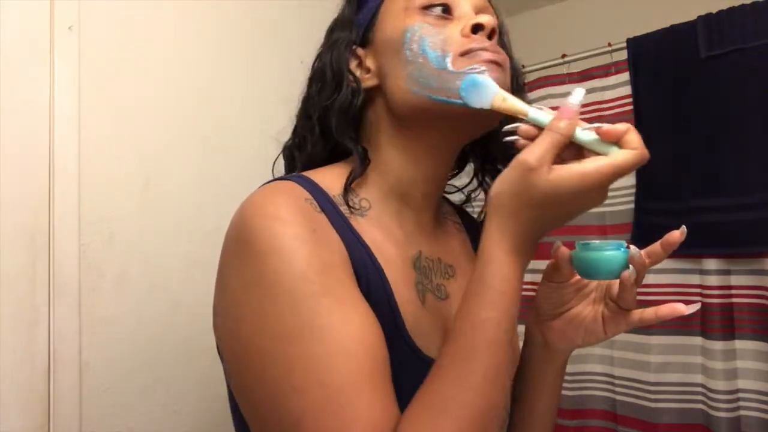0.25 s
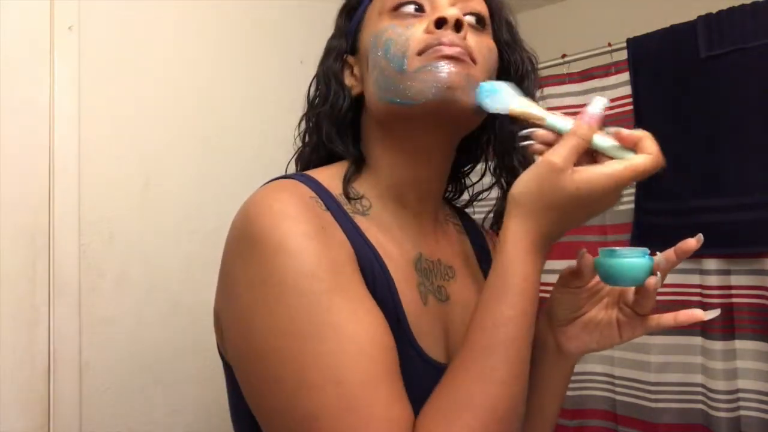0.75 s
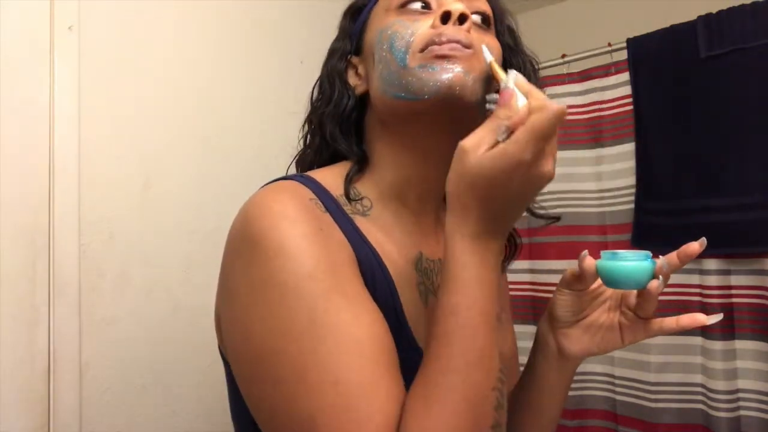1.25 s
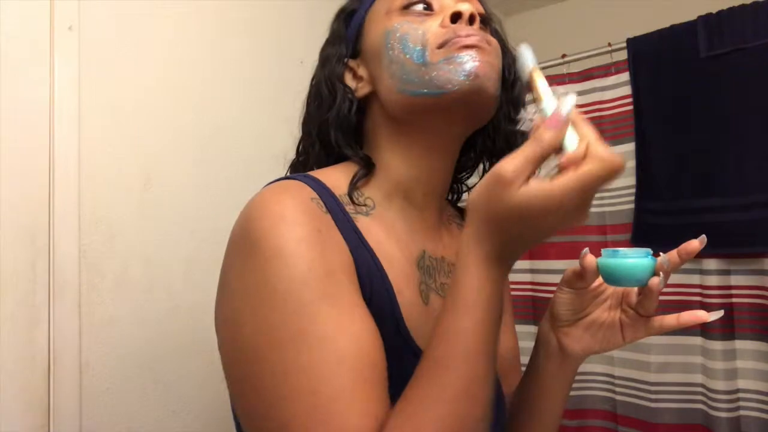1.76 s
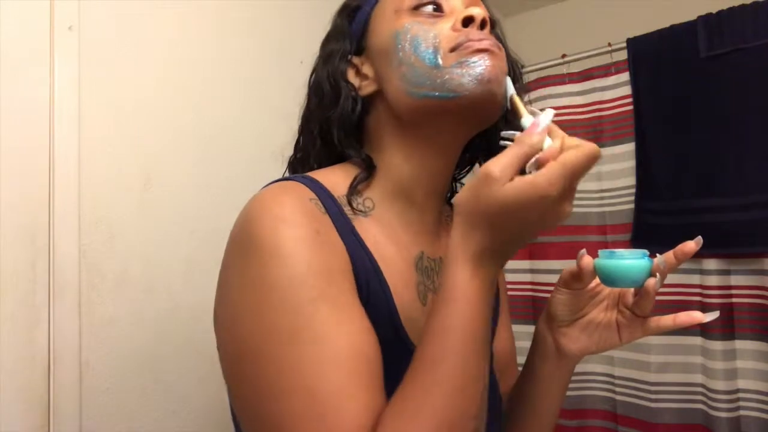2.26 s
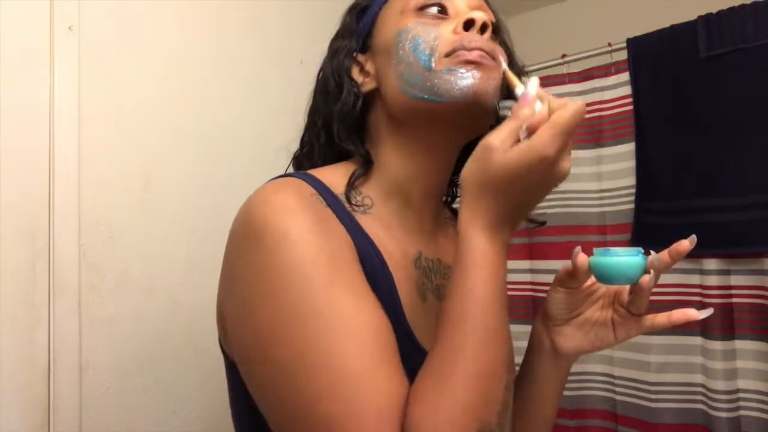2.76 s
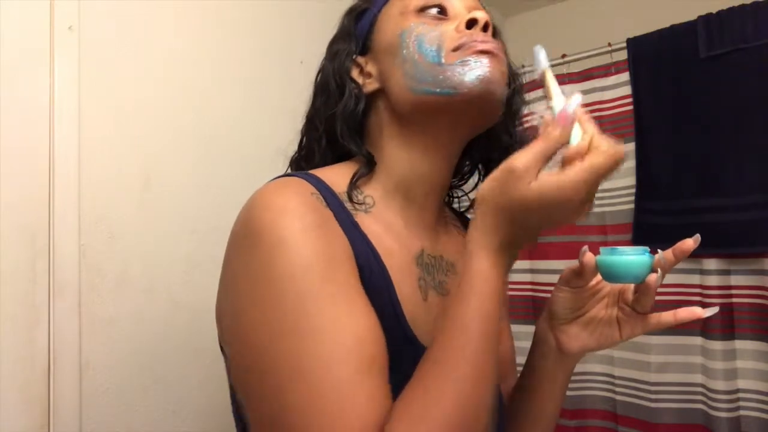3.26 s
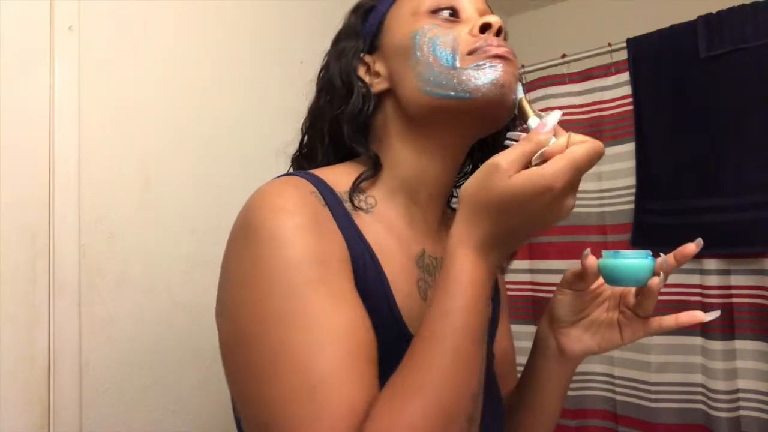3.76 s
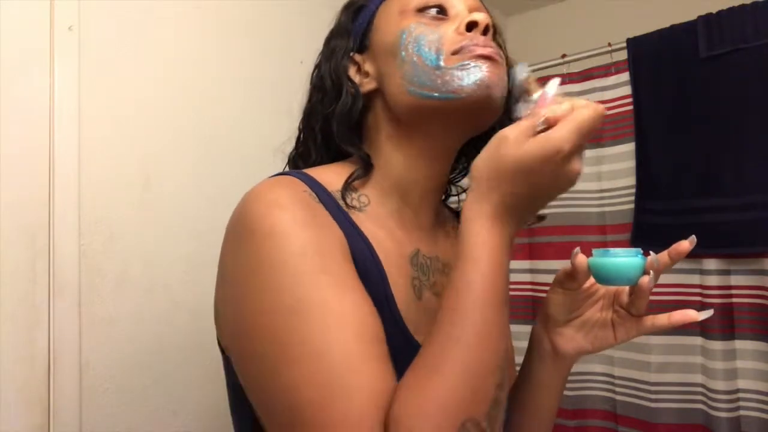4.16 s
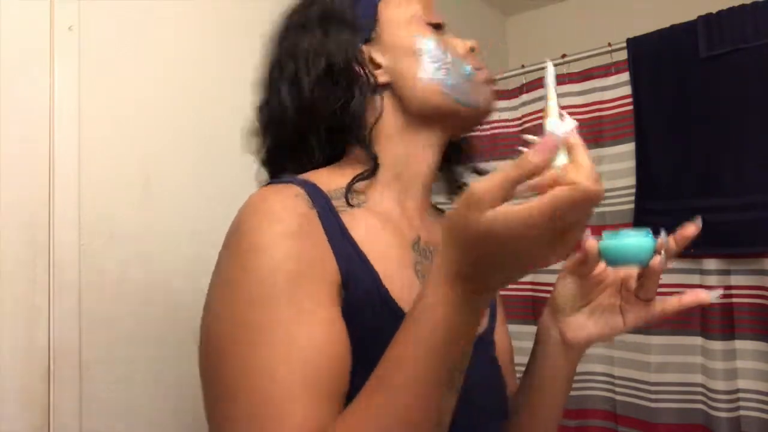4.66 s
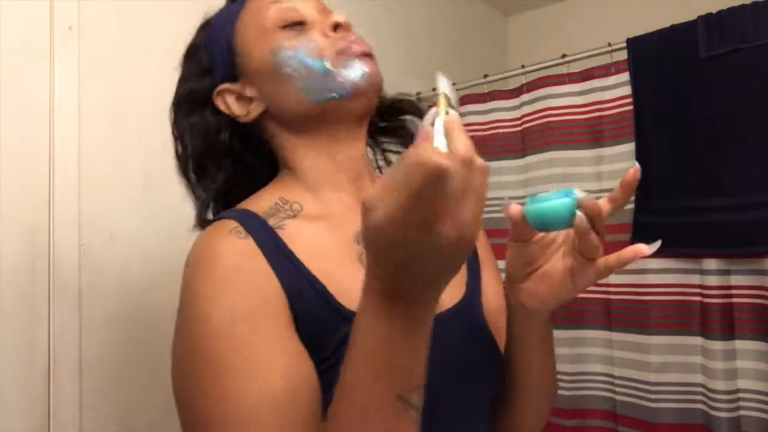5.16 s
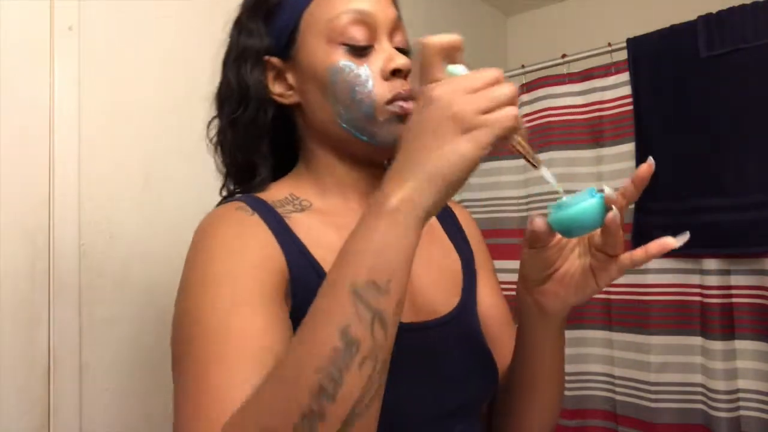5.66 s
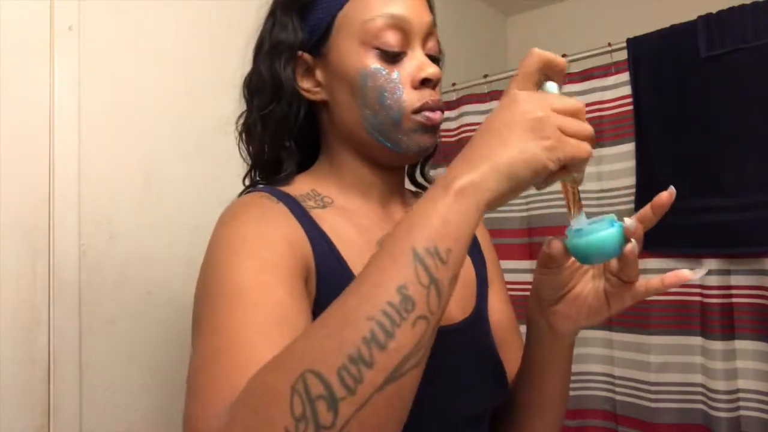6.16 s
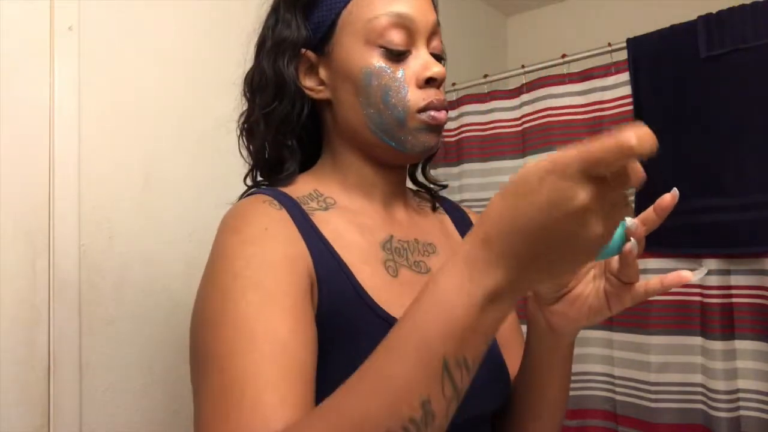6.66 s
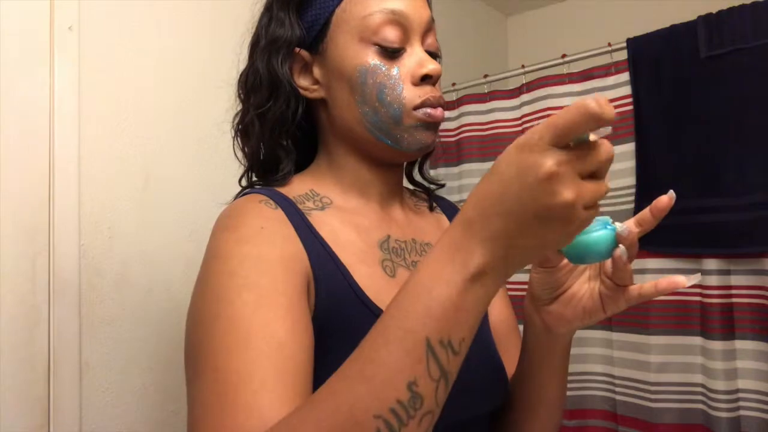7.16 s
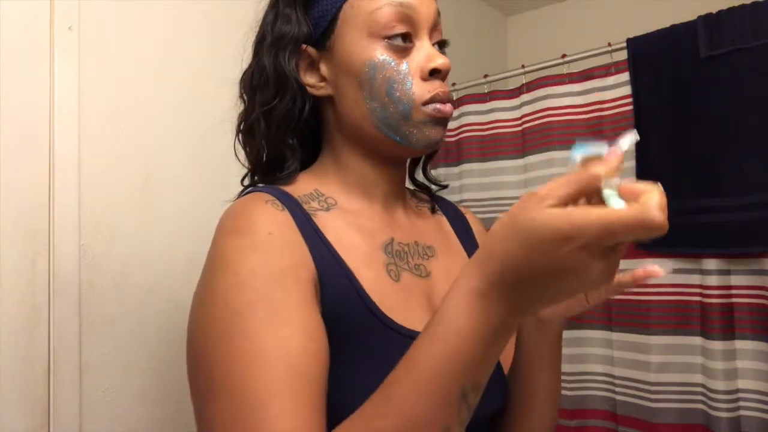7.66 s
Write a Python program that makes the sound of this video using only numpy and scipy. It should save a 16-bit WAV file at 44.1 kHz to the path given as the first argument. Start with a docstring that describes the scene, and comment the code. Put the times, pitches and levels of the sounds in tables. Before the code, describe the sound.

Steady fan drone and airy rush in a small hard room, a fine sizzling tap stream throughout, and occasional barely-there brush strokes and wet clicks.

```python
"""Small bathroom: extractor fan and a thin hissing stream, most likely from the tap, throughout.
From the start: fan blade tones, mains hum and shaped noise for air; the stream is noise plus spatter grains.
From 0.5 s brief noise swishes, most likely a soft brush; from 1.5 s a few small wet ticks.
A faint narrow-band drain note sinks until 4.4 s, then grows and rises; the sixth-harmonic whine is
strongest at 5.5 s. Resonances of hard surfaces colour air and water; both channels are identical."""
import sys
import numpy as np
from scipy import signal
from scipy.fft import rfft, irfft, next_fast_len
from scipy.io import wavfile

SR = 44100
rng = np.random.default_rng(int(sys.argv[2]) if len(sys.argv) > 2 else 0)


def to_wav(sig):
    """Store sig (one row per channel, or 1-D mono) as 16-bit WAV at the path in sys.argv[1].

    Samples outside -1..1 are clipped; the rate is SR.
    """
    pcm = np.clip(np.atleast_2d(sig), -1, 1) * 32767
    pcm = np.round(pcm).astype(np.int16)
    wavfile.write(sys.argv[1], SR, pcm.T)  # frames by channels


N = 349272
TIME = np.arange(N) / SR
CONTROL_STEP = 40  # samples between points of slow curves

# hollow note near the drain: (time [s], pitch [Hz], level [dB rms])
DRAIN_NOTE = [(0, 1455, -66), (4.4, 1473, -72), (4.8, 1512, -66.5), (7.92, 1530, -64)]
# small wet ticks: (time [s], noise level at onset, before basin lift [dB rms])
WET_TICKS = [(1.518, -44), (2.77, -43), (4.9222, -38), (7.7164, -46)]
# swishes, most likely a soft brush on skin and in a jar:
# (start [s], fading time [s], centre [Hz], noise level before envelope and basin lift [dB rms])
BRUSH_SWISHES = [(.485, 0.1, 3570, -48), (1.297, 0.017, 3700, -47.5), (2.05, .07, 3580, -52),
                 (2.218, .025, 3800, -49), (2.59, 0.12, 3500, -53), (3.137, .03, 4400, -51),
                 (4.83, 0.064, 3000, -51), (4.98, .025, 3660, -48), (5.23, .14, 3700, -52),
                 (6.35, .09, 3580, -54), (6.915, .025, 4600, -49), (7.261, .016, 4500, -44),
                 (7.37, .04, 3500, -49)]
SWISH_RISE_SHARE = 0.34  # of the fading time

# air through the fan, relative spectrum: (frequency [Hz], density [dB per Hz])
AIR_SPECTRUM = [(20, -32), (35, -37), (55, -7), (98, -15.5), (135, -5.5), (168, -12), (230, -3.5),
                (305, -5), (375, 3.5), (470, -2), (540, -10.5), (630, -9), (800, -12.5), (2500, -17)]
# fan housing and duct resonances: (frequency [Hz], width [Hz], relative peak gain [dB])
DUCT_RESONANCES = [(134.2, 7.2, 0.5), (228.7, 11, -4.5), (375, 26, 0), (389.4, 15, 1), (625, 19, -5),
                   (1000, 14, -8.5), (1091, 19, -14.5), (1420, 76, -6.5), (1855, 32, -8.5),
                   (2005, 9.3, -3.5)]
# standing waves between walls: (frequency [Hz], width [Hz], lift [dB])
ROOM_MODES = [(312, 3.9, -10), (318, 10, 3), (443, 7.4, -12), (456, 19, 2.5), (494, 11, -5.5),
              (542, 15, -6), (728, 18, -4), (750, 15, -6), (800, 12, 2), (822, 30, 2.5), (1142, 43, -5)]

# fan speed: (time [s], blade-passing rate [Hz])
FAN_SPEED = [(.8, 182.3), (1.6, 183.2), (2.2, 182.7), (2.8, 181.7), (4.6, 181.5), (7.92, 181.8)]
# steady-level blade harmonics: (multiple of blade rate, level before waver [dB rms], waver [dB])
BLADE_TONES = [(1, -55, 0.3), (3, -66, 1.5)]
# second blade harmonic, the loudest: (time [s], level before flutter [dB rms])
SECOND_HARMONIC = [(0, -52), (1.0, -49.5), (2.2, -51), (3.1, -53), (3.8, -51), (4.25, -57.5), (4.7, -52),
                   (6.2, -54.5), (7.1, -50.5), (7.92, -53.5)]
# sixth blade harmonic, a thin whine: (time [s], level before waver [dB rms])
SIXTH_HARMONIC = [(0, -68.5), (2.2, -68), (5.5, -63.5), (7.92, -65)]
# motor hum: (multiple of mains rate, level [dB rms])
MOTOR_HUM = [(1, -66.5), (2, -58)]
MAINS_HZ = 60
# uneven inflow: flutter rate of all blade tones, depth for the second harmonic
INFLOW_HZ, INFLOW_DB = 7.8, 1.25
# rough band around the second harmonic; level relative to it
EDDY_DB, EDDY_WIDTH_HZ = -11, 10.8

# stream strength: (time [s], level before swings and basin lift [dB rms])
STREAM_LEVEL = [(0, -48), (0.45, -45.5), (1.0, -46), (2.2, -46.5), (2.8, -48.5), (4.15, -45.5),
                (4.6, -48.0), (5.0, -47), (5.9, -46), (7.2, -46.5), (7.92, -46.5)]
# stream hiss, relative spectrum: (frequency [Hz], density [dB per Hz])
HISS_SPECTRUM = [(900, -17), (1800, -7.5), (2500, -6.5), (3050, -5.5), (3350, -1.5), (4900, -2.5),
                 (6600, -3.5), (8100, -5.5), (9600, -4), (10300, -9), (11200, -4.5), (13200, -4.5),
                 (15000, 2.5), (16000, -6)]
# spout and basin peaks and dips: (frequency [Hz], width [Hz], lift [dB])
BASIN_MODES = [(2290, 70, -3.5), (2437, 58, 8), (2764, 30, 4.5), (3344, 60, 3), (4210, 140, -3.5),
               (4500, 100, 2), (4960, 140, -13), (6660, 240, 3.5), (7370, 72, 1.5), (10620, 97, 7),
               (12800, 190, 6), (13820, 210, 6.5)]
SURGES_PER_S, SURGE_JITTER_S, SURGE_RISE_S, SURGE_EBB_S, SURGE_DB = 2.6, 0.088, 0.035, 0.14, 0.74
SHIVER_HZ, SHIVER_DB = 12, 0.86

CUTOFF_HZ = 15750


def from_db(db):
    """Decibels to gain."""
    return 10 ** (np.asarray(db) / 20)


def rms_one(x):
    """Scale to rms 1."""
    return x / np.sqrt(np.mean(x ** 2) + 1e-20)


def in_time(rows):
    """Interpolate each column of a curve at every sample."""
    time_s, *columns = np.transpose(rows)
    return [np.interp(TIME, time_s, column) for column in columns]


def drift(corner_hz):
    """Slow random curve, rms 1: noise through two equal one-pole low-passes."""
    r = np.exp(-2 * np.pi * corner_hz * CONTROL_STEP / SR)
    noise = rng.standard_normal(N // CONTROL_STEP + 2002)
    slow = signal.lfilter([1], [1, -2 * r, r * r], noise)[2000:]  # drop filter start-up
    return np.interp(np.arange(N) / CONTROL_STEP, np.arange(len(slow)), rms_one(slow))


def wobble(centre_hz, width_hz):
    """Narrow-band noise, spread 1: two drifts on quadrature carriers."""
    phase = 2 * np.pi * np.cumsum(centre_hz * np.ones(N)) / SR
    return drift(width_hz) * np.cos(phase) + drift(width_hz) * np.sin(phase)


def colour(x, spectrum):
    """Filter x by a (Hz, dB) curve joined on a log-frequency axis."""
    hz, db = np.transpose(spectrum)
    size = next_fast_len(N)
    bins_hz = np.maximum(np.fft.rfftfreq(size, 1 / SR), 1)
    gain = from_db(np.interp(np.log(bins_hz), np.log(hz), db))
    return irfft(rfft(x, size) * gain, size)[:N]


def resonate(x, hz, width_hz):
    """Two-pole resonance, peak gain 1."""
    r = np.exp(-np.pi * width_hz / SR)
    zeros = np.array([1, 0, -1]) * (1 - r * r) / 2
    poles = [1, -2 * r * np.cos(2 * np.pi * hz / SR), r * r]
    return signal.lfilter(zeros, poles, x + 1e-18)


def lift(x, modes):
    """Hard surfaces lift some pitches and cancel others; modes act in series."""
    for hz, width_hz, lift_db in modes:
        x = x + (from_db(lift_db) - 1) * resonate(x, hz, width_hz)
    return x


def bathroom(x, t60_s, wet_db):
    """Direct sound plus a short, dense decaying tail off the hard walls."""
    t = TIME[:SR // 2]
    tail = rng.standard_normal(len(t)) * from_db(-60 * t / t60_s) * (t > .003)
    tail = tail / np.linalg.norm(tail)
    return x + from_db(wet_db) * signal.fftconvolve(x, tail)[:N]


def drain(width_hz):
    """Faint, airy narrow-band note, perhaps from the waste pipe."""
    pitch_hz, level_db = in_time(DRAIN_NOTE)
    return from_db(level_db) * wobble(pitch_hz, width_hz)


def drops(hz, width_hz, decay_s):
    """Each tick: a noise burst, instant onset, exponential decay over milliseconds."""
    bursts = np.zeros(N)
    for start_s, level_db in WET_TICKS:
        bursts += from_db(level_db) * (TIME > start_s) * np.exp(-np.abs(TIME - start_s) / decay_s)
    return bursts * rms_one(resonate(rng.standard_normal(N), hz, width_hz))


def swishes(width_hz):
    """Noise swells that rise quickly and fade, each in its own broad double resonance."""
    out = np.zeros(N)
    for start_s, fade_s, hz, level_db in BRUSH_SWISHES:
        noise = resonate(rng.standard_normal(N), hz, width_hz)
        noise = rms_one(resonate(noise, hz, width_hz))
        age = np.maximum(TIME - start_s, 0) / fade_s
        envelope = np.minimum(age / SWISH_RISE_SHARE, 1) * np.exp(-age ** 2)
        out += from_db(level_db) * envelope * noise
    return out


def fan_air(level_db, top_hz):
    """Turbulence behind the blades, ringing in the housing and duct."""
    rush = colour(rng.standard_normal(N), AIR_SPECTRUM)
    rush = signal.sosfilt(signal.butter(2, top_hz, fs=SR, output="sos"), rush)
    duct = np.zeros(N)
    for hz, width_hz, gain_db in DUCT_RESONANCES:
        duct += from_db(gain_db) * resonate(rng.standard_normal(N), hz, width_hz)
    return from_db(level_db) * rms_one(rush + duct)


def fan_tones(whine_waver_db):
    """Blades chop air at a nearly steady rate; motor hums at mains multiples; eddies smear the second harmonic."""
    blade_hz, = in_time(FAN_SPEED)
    second_db, = in_time(SECOND_HARMONIC)
    whine_db, = in_time(SIXTH_HARMONIC)
    blade_phase = 2 * np.pi * np.cumsum(blade_hz) / SR
    partials = BLADE_TONES + [(2, second_db, INFLOW_DB), (6, whine_db, whine_waver_db)]
    tones = np.zeros(N)
    for multiple, level_db, waver_db in partials:
        gain = from_db(level_db + waver_db * drift(INFLOW_HZ))
        tones += gain * np.sin(round(multiple) * blade_phase + rng.uniform(0, 2 * np.pi))
    for multiple, level_db in MOTOR_HUM:
        cycles = round(multiple) * MAINS_HZ * TIME + rng.random()
        tones += from_db(level_db) * np.sin(2 * np.pi * cycles)
    eddies = from_db(second_db + EDDY_DB) * wobble(2 * blade_hz, EDDY_WIDTH_HZ)
    return np.sqrt(2) * tones + eddies  # sqrt(2): sine rms to peak


def spatter(per_s, spread_db):
    """Countless tiny impacts and bursting bubbles, a few larger; each rings in one of 16 bands."""
    born = rng.random(N) < per_s / SR
    sizes = from_db(spread_db * np.minimum(rng.exponential(1, N), 4.5)) * rng.choice([-1, 1], N)
    pitches_hz = np.geomspace(2400, 15000, 16)
    dealt = rng.integers(0, len(pitches_hz), N)
    grains = np.zeros(N)
    for k, hz in enumerate(pitches_hz):
        grains += resonate(born * sizes * (dealt == k), hz, hz / 3)
    return rms_one(grains)


def shimmer(x, patchy_db, corner_hz):
    """Overlapping bands of x each flicker independently."""
    size = next_fast_len(N)
    spectrum, bins_hz = rfft(x, size), np.fft.rfftfreq(size, 1 / SR)
    centres_hz = np.geomspace(2000, 15000, 14)
    out = np.zeros(N)
    for band in np.eye(len(centres_hz)):
        part = irfft(spectrum * np.interp(bins_hz, centres_hz, band), size)[:N]
        out += part * from_db(patchy_db * drift(corner_hz))
    return out


def surges():
    """Quick rises and slow ebbs at uneven intervals; mean 0, spread 1."""
    starts_s = np.arange(-2, 30) / SURGES_PER_S + rng.uniform(0, 1 / SURGES_PER_S)
    starts_s = starts_s + SURGE_JITTER_S * rng.standard_normal(len(starts_s))
    coarse_s = TIME[::CONTROL_STEP]
    ages_s = np.maximum(coarse_s - starts_s[:, None], 0)
    flow = np.sum((1 - np.exp(-ages_s / SURGE_RISE_S)) * np.exp(-ages_s / SURGE_EBB_S), axis=0)
    return np.interp(TIME, coarse_s, rms_one(flow - flow.mean()))


def stream(spatter_db, flutter_db):
    """Smooth spray and grainy spatter surge together while their colour shifts."""
    level_db, = in_time(STREAM_LEVEL)
    swing_db = SURGE_DB * surges() + SHIVER_DB * drift(SHIVER_HZ)
    grains = rms_one(bathroom(spatter(per_s=7000, spread_db=2.5), t60_s=0.16, wet_db=-2.5))
    water = rng.standard_normal(N) + from_db(spatter_db) * grains
    water = water * from_db(flutter_db * drift(40))
    water = shimmer(water, patchy_db=1.02, corner_hz=7.2)
    return from_db(level_db + swing_db) * rms_one(colour(water, HISS_SPECTRUM))


def scene():
    """Sum fan, water, swishes and drain; same signal in both channels."""
    tones = fan_tones(whine_waver_db=0.7)
    air = lift(fan_air(level_db=-52.5, top_hz=2780), ROOM_MODES)
    water = stream(spatter_db=0.5, flutter_db=0.85)
    at_basin = water + swishes(width_hz=1350) + drops(hz=5200, width_hz=4100, decay_s=0.0039)
    mono = tones + air + lift(at_basin, BASIN_MODES) + drain(width_hz=43)
    return np.tile(mono, (2, 1))


def record(dry):
    """Steep elliptic low-pass cuts the top."""
    return signal.sosfilt(signal.ellip(14, .1, 80, CUTOFF_HZ, fs=SR, output="sos"), dry)


dry = scene()
out = record(dry)
to_wav(out)
```